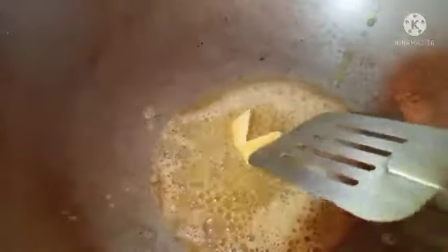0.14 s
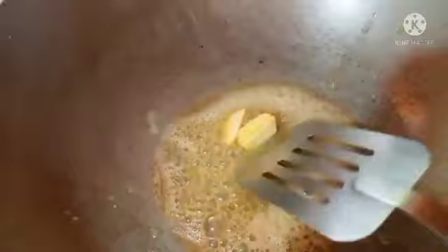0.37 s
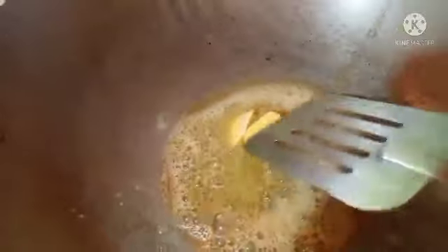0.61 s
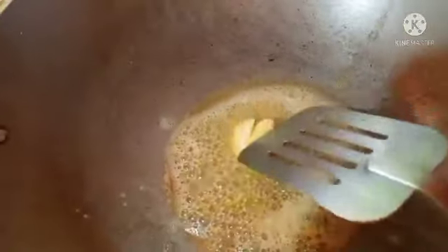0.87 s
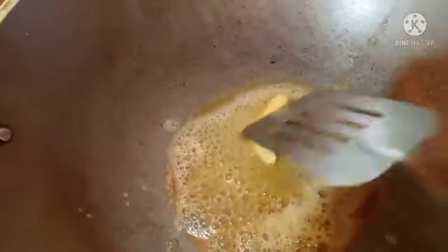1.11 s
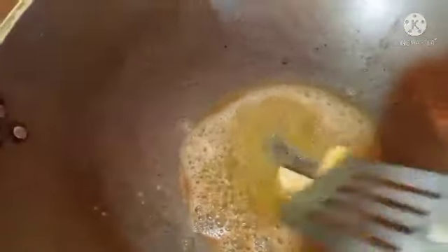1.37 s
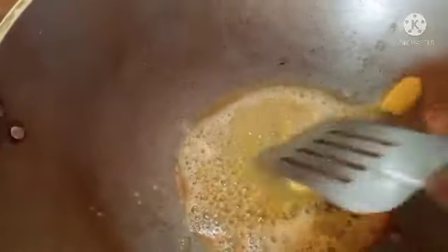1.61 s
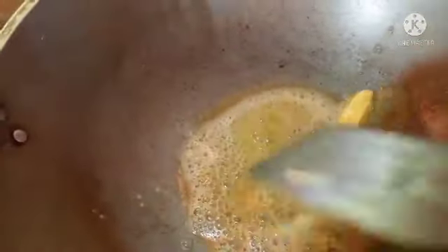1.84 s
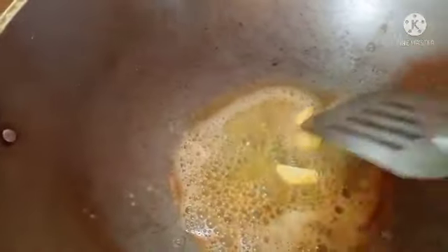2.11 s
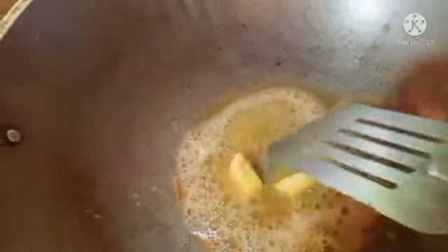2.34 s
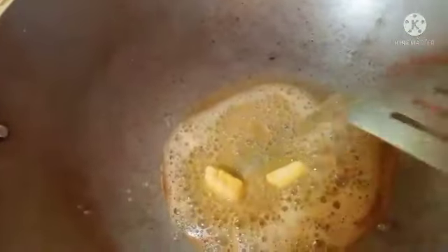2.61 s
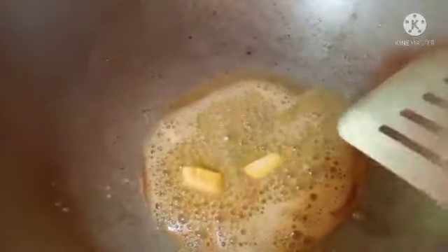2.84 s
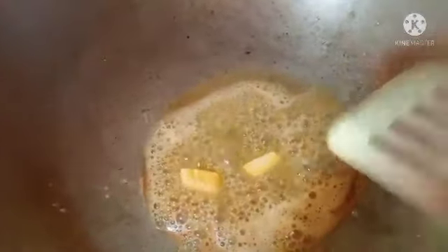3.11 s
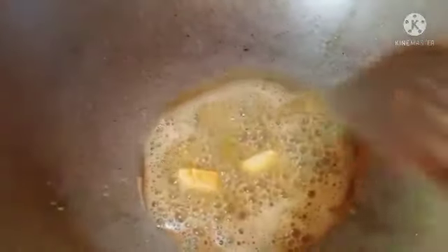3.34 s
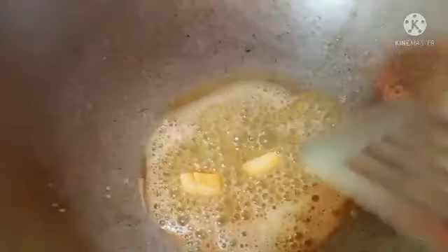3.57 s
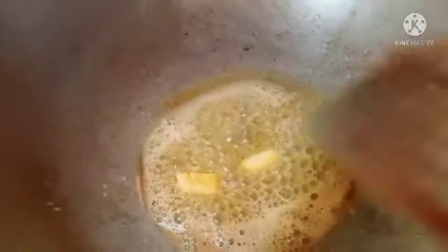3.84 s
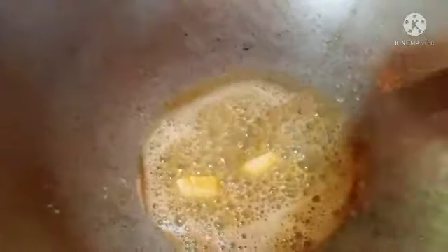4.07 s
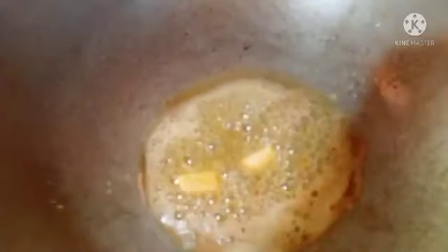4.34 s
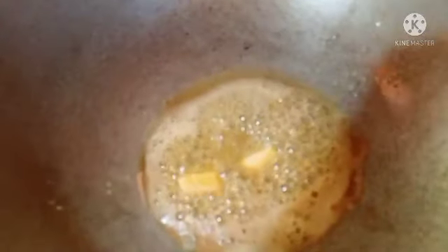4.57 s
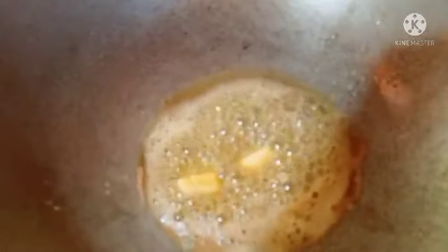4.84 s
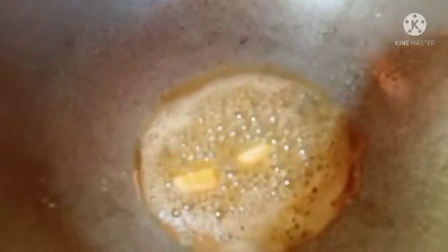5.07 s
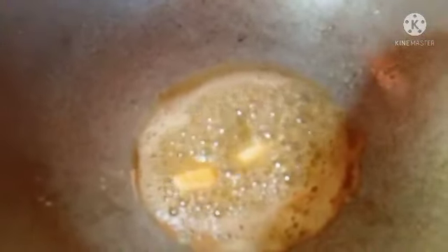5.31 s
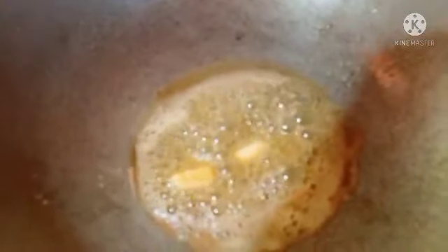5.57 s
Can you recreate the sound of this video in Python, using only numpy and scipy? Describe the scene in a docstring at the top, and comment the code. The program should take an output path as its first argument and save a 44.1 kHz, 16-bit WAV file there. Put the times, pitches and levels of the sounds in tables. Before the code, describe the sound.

Close phone-like pickup in a small kitchen: butter foams with fine, bright sizzle and sharp pops over a faint low gas-flame rumble. A steel spatula clacks once early, then again with a short rattling slide as the sizzle surges. The frying gradually calms while faint rubs and light rim taps follow, ending in soft fizz and sparse pops.

```python
"""Butter foams in a hot steel pan: grains of bursting steam bubbles over hiss, swelling when it is pushed
onto bare metal. A gas flame rumbles as noise in the low air resonances of a small kitchen; single bubbles pop.
A steel spatula clacks twice on the pan, slides, rubs and later taps the rim: damped modes with noise cracks,
and filtered friction noise for the rubs. A close phone microphone drops the deep bass."""
import sys
import numpy as np
from scipy import signal
from scipy.fft import rfft, irfft, next_fast_len
from scipy.io import wavfile
from scipy.ndimage import uniform_filter1d, map_coordinates

SR = 44100
rng = np.random.default_rng(int(sys.argv[2]) if len(sys.argv) > 2 else 0)


def store_pcm(level_fs):
    """Save levels as 16-bit WAV."""
    pcm = np.round(np.clip(level_fs, -1, 1) * 32767).astype(np.int16)
    wavfile.write(sys.argv[1], SR, np.atleast_2d(pcm).T)


def volts(x):
    """Linear amplitude factor 10**(x/20) for a level x in dB, scalar or array-like."""
    e = np.asarray(x, float) / 20
    return 10 ** e


N = 250929

# How hard the butter boils, as the level of the fine fizz. Each row: time in seconds, level in dB.
BOIL = [(0, -48.5), (.27, -52.5), (.58, -50.5), (.9, -54), (1.2, -50.5), (1.33, -53.5), (1.385, -45.5),
        (1.63, -46.5), (1.7, -38), (1.9, -38), (2.31, -40), (2.64, -44.5), (3.0, -48), (3.5, -50),
        (3.98, -52), (4.08, -54), (5.1, -57), (5.69, -56)]
MEAN_BOIL_DB = -50


def unit(x):
    """Scale to rms 1."""
    return x / np.sqrt(np.mean(x ** 2) + 1e-20)


def along(points, hz):
    """Read (Hz, value) points on a log frequency axis."""
    point_hz, value = np.transpose(points)
    return np.interp(np.log(hz + 1), np.log(point_hz + 1), value)


def curve(rows):
    """Interpolate (seconds, value) rows to one value per sample."""
    s, value = np.transpose(rows)
    return np.interp(np.arange(N) / SR, s, value)


def wobble(rate_hz):
    """A smooth random curve with rate_hz knots a second."""
    knots = rng.standard_normal(int(N * rate_hz / SR) + 4)
    return map_coordinates(knots, [np.arange(N) * rate_hz / SR])


def filtered(x, response):
    """Multiply the spectrum of x by a complex response of frequency."""
    size = next_fast_len(N + SR // 2)
    spectrum = rfft(x, size) * response(np.fft.rfftfreq(size, 1 / SR))
    return irfft(spectrum, size)[..., :N]


def coloured(x, spectrum_db):
    """Causal (minimum-phase) colouring, so that clicks keep a sharp front."""
    size = 2048
    gain = volts(along(spectrum_db, np.fft.rfftfreq(size, 1 / SR)))
    cepstrum = irfft(np.log(gain), size)
    cepstrum[1:size // 2] *= 2
    cepstrum[size // 2 + 1:] = 0
    impulse = irfft(np.exp(rfft(cepstrum)), size)
    return signal.fftconvolve(x, impulse)[:N]


def resonant(modes):
    """Response of (Hz, width Hz, dB) resonances summed with alternating sign."""
    def response(f):
        total = 0
        for k, (hz, width_hz, db) in enumerate(modes):
            damping = 1j * f * width_hz
            total = total + (-1) ** k * volts(db) * damping / (hz * hz - f * f + damping)
        return total
    return response


def lay(start_s, hz, cycles, size):
    """Sum damped sine grains with a soft front, one for each start time."""
    t = np.arange(96) / SR
    age = t * hz[:, None] / cycles[:, None]
    tone = np.sin(2 * np.pi * hz[:, None] * t)
    grain = size[:, None] * tone * age * np.exp(1 - age)
    where = np.round(start_s * SR).astype(int)[:, None] + np.arange(len(t))
    return np.bincount(where.ravel(), grain.ravel(), N + SR)[:N]


def crackle(count, centre_hz, octaves, cycles, spread_db, clump, hiss_db):
    """Bursting bubbles, few large and many small, in clumps, over steam hiss."""
    when, pitch, size = rng.random((count, 3)).T
    hz = np.clip(centre_hz * 2 ** (octaves * (2 * pitch - 1)), 500, SR / 2.5)
    strength = volts(-spread_db * np.log(1 - .99 * size)) * np.sqrt(hz)
    grains = lay(when * N / SR, hz, np.full(count, cycles), strength)
    return clump * unit(grains) + volts(hiss_db) * rng.standard_normal(N)


def foam():
    """Fizz, spatter and mist follow the boil, spatter partly late; bunching and snaps reach all three."""
    # Colour of each layer at the microphone. Each row: frequency in Hz, relative gain in dB.
    fizz_colour = [(3000, -26.5), (5000, -12), (6500, -9.5), (7600, -3.5), (8500, 4.5), (9200, -1),
                   (10000, -12), (11300, -13), (12300, -13), (14000, -33)]
    spatter_colour = [(300, -31.5), (700, -18), (1100, -8), (1500, -10.5), (2200, -4.5), (2900, -0.5),
                      (3400, -4.5), (4500, -8.5), (5500, -6), (7000, -4.5), (9000, -47)]
    mist_colour = [(8000, -19.5), (11300, -7), (12500, -13), (13500, -4), (15400, -2.5), (15700, -43),
                   (20000, -78)]
    # Swells and fades of the mist, added to its boil-driven level. Each row: time in seconds, offset in dB.
    mist_swell = [(0, 3.5), (.6, -2.5), (1.52, -3), (1.63, 4.5), (1.75, -3.5), (2.1, 2.5), (2.4, -3),
                  (4, -5), (5.69, -2)]
    # The level dips briefly: start in seconds, end in seconds, gain in dB.
    level_dip = (.446, .467, -15.5)

    fizz_db = curve(BOIL)
    swing_db = fizz_db - MEAN_BOIL_DB
    quick_share, lag_s = 0.54, 0.27
    keep = np.exp(-1 / (lag_s * SR))
    late_db = signal.lfilter([1 - keep], [1, -keep], swing_db)
    spatter_db = -58 + quick_share * swing_db + (1 - quick_share) * late_db
    mist_db = -57 + 1.1 * swing_db + curve(mist_swell)

    bunch = wobble(20)
    snaps = crackle(count=2500, centre_hz=11500, octaves=0.42, cycles=0.15, spread_db=2.5,
                    clump=volts(0.31 * bunch + 3.9 * wobble(36)), hiss_db=-38)
    fizz = crackle(count=7000, centre_hz=8000, octaves=0.42, cycles=0.61, spread_db=3.0,
                   clump=volts(0.49 * bunch + 1.9 * wobble(60)), hiss_db=-1.5)
    spatter = crackle(count=6000, centre_hz=3000, octaves=1.27, cycles=0.17, spread_db=3,
                      clump=volts(1.1 * bunch + 2.3 * wobble(30)), hiss_db=1.5)
    mist = crackle(count=6000, centre_hz=13100, octaves=0.38, cycles=0.6, spread_db=5.0,
                   clump=volts(1.2 * bunch + 1.1 * wobble(50)), hiss_db=-0.5)

    total = volts(fizz_db) * unit(coloured(fizz + 0.51 * snaps, fizz_colour))
    total += volts(spatter_db) * unit(coloured(spatter + 1.52 * snaps, spatter_colour))
    total += volts(mist_db) * unit(coloured(mist + 0.59 * snaps, mist_colour))

    t = np.arange(N) / SR
    start_s, end_s, dip_db = level_dip
    inside = 1.0 * (t > start_s) * (t < end_s)
    return total * volts(dip_db * uniform_filter1d(inside, size=150))


def flame():
    """Burner noise gathers in the low air resonances and flickers, over a broad hiss."""
    # Air resonances of the kitchen. Each row: frequency in Hz, width in Hz, relative gain in dB.
    air_low = [(95.8, 4.4, 3), (131, 11, -9)]
    air_next = [(163.3, 11, 2.5), (257.9, 16.8, -0.5), (329, 56, -13), (457, 236, -16.5)]
    # Level of the upper air resonances before flicker. Each row: time in seconds, level in dB.
    next_level = [(0, -62), (1.5, -56), (2.46, -61.5), (3.0, -60.5), (3.6, -62.5), (5.3, -63.5),
                  (5.69, -67.5)]
    # Flame hiss spectrum. Each row: frequency in Hz, relative gain in dB.
    hush_colour = [(25, 7), (45, -21), (70, -0.5), (100, -9.5), (500, -11.5), (1000, -12), (3000, -18.5),
                   (6000, -43)]

    low_db = -57 - 0.9 * np.arange(N) / SR  # slow fading
    low_db = low_db + 0.83 * wobble(7.5) + 2.5 * wobble(1.43)
    next_db = curve(next_level) + 1.4 * wobble(4.9)
    low = unit(filtered(rng.standard_normal(N), resonant(air_low)))
    upper = unit(filtered(rng.standard_normal(N), resonant(air_next)))
    hush = unit(filtered(rng.standard_normal(N), lambda f: volts(along(hush_colour, f))))
    boom = volts(low_db) * low + volts(next_db) * upper
    boom = filtered(boom, lambda f: (f / 70) ** 3 / (1 + (f / 70) ** 3))
    return boom + volts(-64.5) * hush


def lesser_pops(count):
    """Rows (s, dB, Hz) of bursts at random moments, louder when the boil is strong."""
    # Bubble sizes. Each row: pitch in Hz, spread either way in octaves, middle level in dB at mean boil.
    bubble_sizes = [(3180, 0.19, -41), (5500, 0.28, -38.5), (8500, 0.044, -37)]
    when, kind, pitch, size = rng.random((count, 4)).T
    centre_hz, octaves, db = np.array(bubble_sizes)[(kind * len(bubble_sizes)).astype(int)].T
    s = 0.01 + when * (N / SR - 0.02)
    swing_db = np.interp(s, *np.transpose(BOIL)) - MEAN_BOIL_DB
    level_db = db + 0.55 * swing_db + 6 * (size - 0.5)
    return np.transpose([s, level_db, centre_hz * 2 ** (octaves * (2 * pitch - 1))])


def pops():
    """Single bursts; small bubbles ring for more cycles, each leaves a short, broader spit of droplets."""
    # Single bursts at set times, loud and faint. Each row: time in seconds, nominal peak in dB, pitch in Hz.
    placed_pops = [(0.0762, -32, 8750), (0.0969, -27.5, 8850), (0.1667, -28, 3230), (0.2131, -31, 8300),
                   (0.346, -31, 8600), (0.3751, -29, 8800), (0.594, -29.5, 2700), (0.6018, -30, 8300),
                   (0.6148, -29, 8500), (0.813, -30, 8660), (0.8596, -32, 8850), (1.1512, -37.5, 3970),
                   (1.1542, -27, 8340), (1.372, -44, 4900), (1.3721, -24.5, 7400), (1.42, -26.5, 8350),
                   (1.4243, -33.5, 3000), (1.5989, -23, 8300), (1.877, -22, 3330), (1.9916, -21, 8000),
                   (2.018, -28.5, 3400), (2.1166, -25, 3500), (2.2237, -25, 2700), (2.3083, -30, 3400),
                   (2.3287, -26, 8800), (2.3931, -29, 4320), (2.4956, -30, 8300), (2.581, -27, 8400),
                   (2.756, -28, 8300), (2.7655, -28, 8000), (2.9887, -20, 8500), (3.0704, -29, 8300),
                   (3.3339, -31, 8450), (3.401, -30, 8800), (3.4772, -29.5, 8560), (3.621, -28.5, 8900),
                   (3.6386, -29, 8700), (3.684, -28, 8470), (3.8109, -27, 8700), (3.8411, -38, 3600),
                   (3.9852, -31, 8700), (4.1538, -37.5, 3740), (4.2175, -37, 3760), (4.2547, -34, 8000),
                   (4.3755, -36, 3200), (4.3748, -32, 8300), (4.6763, -35.5, 3180), (4.6771, -34.5, 8550),
                   (5.0618, -37.5, 4780), (5.1032, -33, 4260), (5.3323, -34, 8470), (5.458, -35.5, 9070),
                   (5.463, -34, 3680), (5.4974, -33.5, 4740)]
    s, db, hz = np.vstack([placed_pops, lesser_pops(count=65)]).T
    cycles = 0.5 * (hz / 4000) ** 2.1
    burst = lay(s - cycles / hz, hz, cycles, volts(db + 1.13))  # the grain's envelope peaks at s
    droplet = lay(s, hz, 0.64 * cycles, volts(db - 1.0))
    t = np.arange(SR // 20) / SR
    spit = rng.standard_normal(len(t)) ** 3 * volts(-60 * t / 0.056) * (t > 0.001)
    return burst + signal.fftconvolve(droplet, spit / np.linalg.norm(spit))[:N]


def ring(modes, rise_s, scatter_db, rattle):
    """One blow: damped (Hz, dB, t60 s) modes; loose contact shakes their phase and size."""
    hz, db, t60_s = np.transpose(modes)[:, :, None]
    t = np.arange(SR // 4) / SR
    strength_chance, phase_chance = rng.standard_normal((2, len(modes), 1))
    knots = rng.standard_normal((2, len(modes), 40))
    phase_shake, size_shake = signal.resample(knots, len(t), axis=2)
    phase = 2 * np.pi * hz * t + 1.8 * phase_chance + rattle * phase_shake
    level_db = db + scatter_db * strength_chance + 2 * rattle * size_shake - 60 * t / t60_s
    tones = volts(level_db) * np.sin(phase)
    return tones.sum(0) * (1 - np.exp(-t / rise_s))


def clacks():
    """Each contact rings the steel; sharp ones add more snap, crack and dense shimmer of high modes."""
    # Pan and blade modes. Each row: frequency in Hz, free t60 in seconds, then relative level in dB
    # struck with the corner, struck flat, sliding.
    steel = np.array([(310, 0.32, -12, -38.5, -45), (651, 0.19, -39, -15, -28), (711, 0.23, -20, -23, -16),
                      (847, 0.14, -20, -2, -1), (899, 0.12, 4.5, -26, -15), (914, 0.41, -12, -8, -25),
                      (960, 0.19, -32.5, -7.5, -6.5), (1230, 0.14, -29, 0.5, -15),
                      (1308, 0.19, -12.5, 0, -32), (1468, 0.08, -6.5, -23, -25),
                      (1468, 0.23, -10.5, -8, -27), (1585, 0.094, -11, -9, -19.5), (1647, .11, -5, -5, 0),
                      (1570, 0.084, 2, -28, -10), (1762, 0.057, 7.5, -15.5, -21),
                      (1970, 0.087, -6, -14.5, -14), (2294, 0.094, 5, 5, -5.5), (2580, 0.32, -23, -30, -16),
                      (2580, 0.11, 3, -41, -24), (2600, .16, -8, -30, -29), (2700, 0.092, -5.5, -26, -9),
                      (3093, 0.075, -23, -3, -16), (3158, 0.088, -1, -15, -31), (3620, 0.11, -1, -7, -30),
                      (3780, 0.069, -4.5, -6, -6), (3950, 0.15, -3.5, -37, -28),
                      (4160, 0.13, -35, -52, -28), (5050, 0.094, -6.5, -30, -28)])
    # Crowds of high modes. Each row: frequency in Hz, width in Hz, relative gain in dB.
    shimmer_modes = [(5070, 570, -1), (6840, 110, 16), (8300, 180, 23), (10400, 330, 10), (12800, 2500, -3)]
    # Contacts. Each row: time in seconds, level in dB, way (0 corner, 1 flat, 2 sliding),
    # ring time as a share of the free one.
    contacts = [(0.4682, -21.5, 0, 0.5), (0.4701, -32, 0, 1.17), (0.4756, -26.5, 0, 0.31),
                (.486, -31.5, 0, 0.36), (0.5, -28.5, 2, 1.14), (1.7012, -18.5, 1, 0.55),
                (1.7085, -23.5, 1, 0.62), (1.722, -29, 1, 0.21), (1.736, -27, 1, 0.19),
                (1.748, -28.5, 2, 0.4), (1.772, -27.5, 2, 0.81), (1.779, -29.5, 2, 0.59),
                (1.787, -23.5, 2, 0.46), (1.797, -30.5, 2, 0.48), (1.812, -44, 2, 0.25)]

    out, shimmer = np.zeros(N + SR), np.zeros(N + SR)
    t = np.arange(SR // 4) / SR
    for s, db, way, free_share in contacts:
        first_s = min(c[0] for c in contacts if c[2] == way)
        # rebounds rise more slowly, by 0.025 s per s after the first contact
        rise_s = 0.0026 if way == 2 else 0.00033 + 0.025 * (s - first_s)
        modes = np.transpose([steel[:, 0], steel[:, 2 + way], free_share * steel[:, 1]])
        blow = ring(modes, rise_s, scatter_db=0.5, rattle=0.68)
        hardness = 0.00022 / (rise_s + 0.00039)
        snap = 14 * np.sin(2 * np.pi * 2600 * t) * volts(-60 * t / 0.0032)
        crack = uniform_filter1d(rng.standard_normal(len(t)), size=4)
        crack *= volts(-60 * t / 0.0052) + 2.5 * volts(-60 * t / 0.068)
        spray = rng.standard_normal(len(t)) * volts(-60 * t / 0.042)
        start = round(s * SR)
        out[start:][:len(t)] += volts(db) * (blow + hardness * (snap + crack))
        shimmer[start:][:len(t)] += volts(db + [8, -3, -3][way]) * hardness * spray
    # a thin pan radiates little bass
    body = filtered(out[:N], lambda f: (1j * f / 300 / (1 + 1j * f / 300)) ** 2)
    return body + filtered(shimmer[:N], resonant(shimmer_modes))


def kitchen(x):
    """Room reverberation: each frequency of a noise tail dies at its own speed."""
    # Reverberation time. Each row: frequency in Hz, t60 in seconds.
    tail_t60 = [(200, 0.25), (2000, 0.29), (10000, 0.17)]
    hz, t, z = signal.stft(rng.standard_normal(SR // 2), SR, nperseg=256)
    decay = volts(-60 * t / along(tail_t60, hz)[:, None])
    tail = signal.istft(z * decay, SR, nperseg=256)[1]
    delayed = np.pad(x, (200, 0))
    return signal.fftconvolve(delayed, tail / np.linalg.norm(tail))[:N]


def rubs():
    """Uneven friction excites one blade resonance and its skirts for the length of the stroke."""
    # Short rubs. Each row: start in seconds, length in seconds, pitch in Hz, width in Hz, level in dB.
    strokes = [(2.75, 0.025, 944, 60, -58.5), (2.853, 0.05, 1275, 80, -55),
               (2.854, 0.049, 1075, 120, -56.5), (3.055, 0.024, 895, 120, -53),
               (3.087, 0.028, 1230, 150, -60), (3.657, 0.17, 910, 300, -62)]
    out, t = np.zeros(N), np.arange(N) / SR
    grit = rng.standard_normal(N) * volts(0.98 * wobble(160))
    for s, length_s, hz, width_hz, db in strokes:
        onset = np.clip((t - s) / 0.0066, 0, 1)
        stroke = onset * volts(-60 * np.maximum(t - s - length_s, 0) / 0.26)
        narrow, skirts = resonant([(hz, width_hz, 0)]), resonant([(hz, 500, 0)])
        out += volts(db) * stroke * unit(filtered(grit, lambda f: narrow(f) * skirts(f)))
    return out


def taps():
    """Light rim taps: landing place sets middle and tick; the blade gains later, its tip twice as fast."""
    # Modes of the hand-held rim. Each row: frequency in Hz, level in dB relative to its group,
    # t60 in seconds, group rounded to whole (0 body, 1 middle, 2 tick, 3 blade, 4 blade tip).
    rim = np.array([(253, -4, 0.079, 1), (492, -5.5, 0.099, 0.5), (699, 2, 0.14, 0),
                    (1015, -7.5, 0.052, 0.5), (1185, -3, 0.1, 1), (1267, -11.5, 0.15, 1.5),
                    (1760, 10.5, 0.018, 2), (2032, 4, 0.065, 3.5), (2700, -1.5, 0.03, 3),
                    (3500, -11, 0.11, 4)])
    # Taps. Each row: time in seconds, body level in dB, middle over body in dB, tick over body in dB.
    touches = [(3.142, -45.5, -5, -12.5), (3.276, -51.5, -9, 4.5), (3.311, -39.5, -13, -3.5),
               (3.429, -49.5, -4, -7), (3.477, -47, 2, 4), (3.584, -49, -3, -6), (3.637, -48.5, 7, 5.5),
               (3.744, -56, -13, 1.5), (3.812, -47.5, -7, 4.5), (3.92, -61, 8, 4), (3.985, -46, 4, -1.7),
               (4.534, -49, 2, 1.3), (4.598, -42.5, -1.2, -2.7), (4.965, -55.5, 6, 4), (4.977, -51, 2, 1.8),
               (5.066, -56.5, -1, -4), (5.083, -54, -1, -1)]

    out, t = np.zeros(N + SR), np.arange(SR // 4) / SR
    group = np.round(rim[:, 3]).astype(int)
    for s, body_db, middle_over_db, tick_over_db in touches:
        tick_db = body_db + tick_over_db
        blade_db = tick_db - 7 + 4.5 * (s - touches[0][0])  # gains 4.5 dB per s on the tick
        tip_db = 2 * blade_db - body_db  # strong only when the blade outrings the body
        group_db = np.array([body_db, body_db + middle_over_db, tick_db, blade_db, tip_db])
        body_bend = 1 + 0.0186 * rng.standard_normal()
        hz = rim[:, 0] * np.where(group == 0, body_bend, 1)
        modes = np.transpose([hz, rim[:, 1] + group_db[group], rim[:, 2]])
        crack = uniform_filter1d(rng.standard_normal(len(t)), size=8)
        crack *= volts(tick_db + 20.5 - 60 * t / 0.0027)
        out[round(s * SR):][:len(t)] += ring(modes, 0.0011, scatter_db=2.0, rattle=0.38) + crack
    return out[:N]


def scene():
    """All sources; clacks and taps also excite the kitchen."""
    hits, light = clacks(), taps()
    struck = hits + volts(-17) * kitchen(hits) + light + volts(-14) * kitchen(light)
    return (struck + rubs() + foam() + pops() + flame())[None]


def top_cut(x):
    """Nothing passes above the cut-off."""
    return signal.sosfilt(signal.butter(12, 16850, fs=SR, output="sos"), x)


def record(dry):
    """The microphone drops the deep bass: second-order high-pass at 50 Hz."""
    mix = filtered(dry, lambda f: (1j * f / 50 / (1 + 1j * f / 50)) ** 2)
    return top_cut(mix)


dry = scene()
out = record(dry)
store_pcm(out)
```